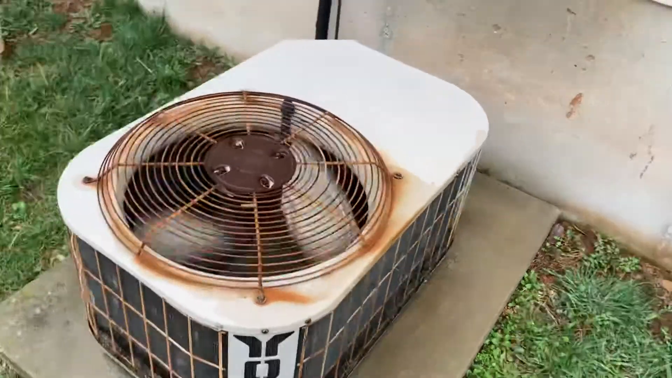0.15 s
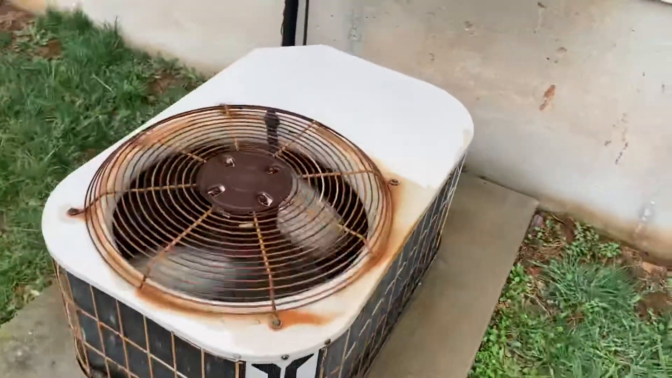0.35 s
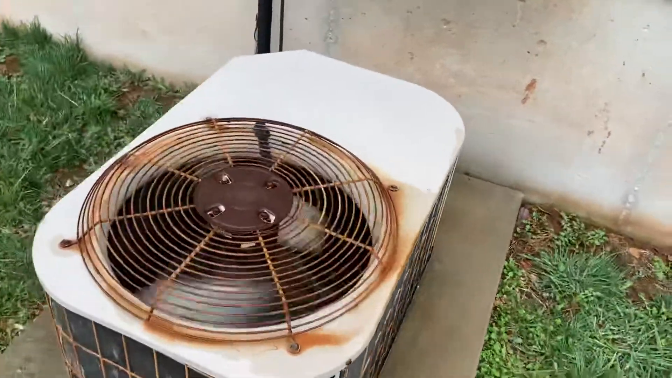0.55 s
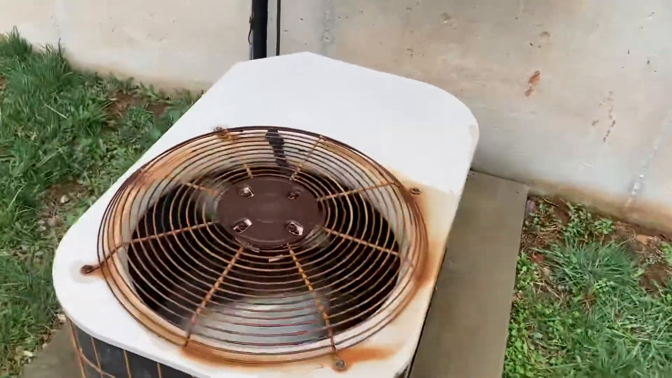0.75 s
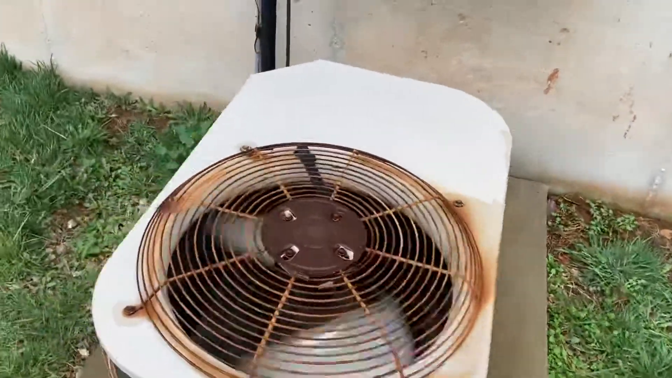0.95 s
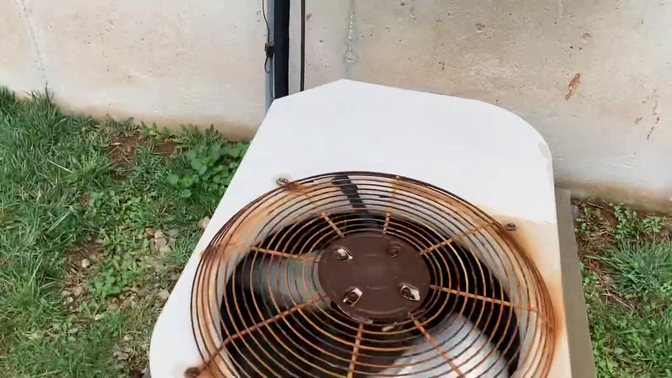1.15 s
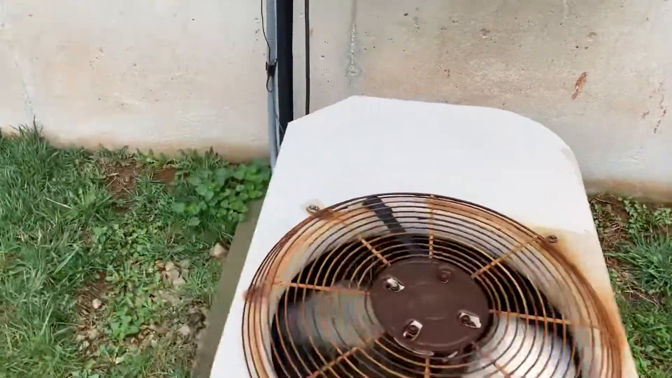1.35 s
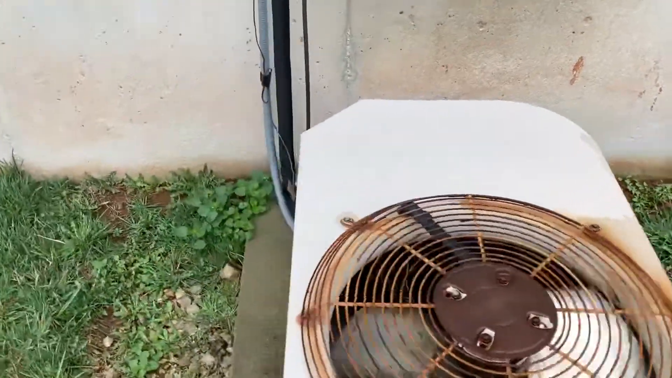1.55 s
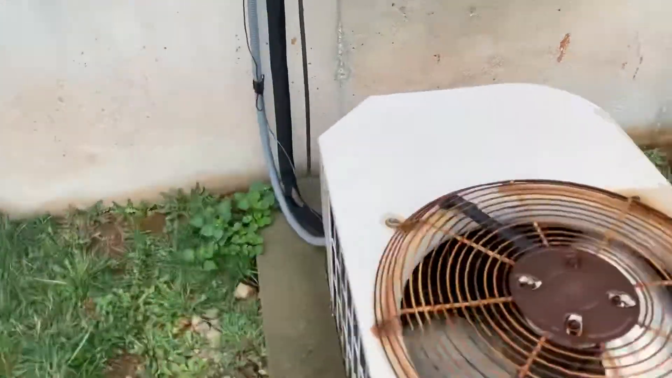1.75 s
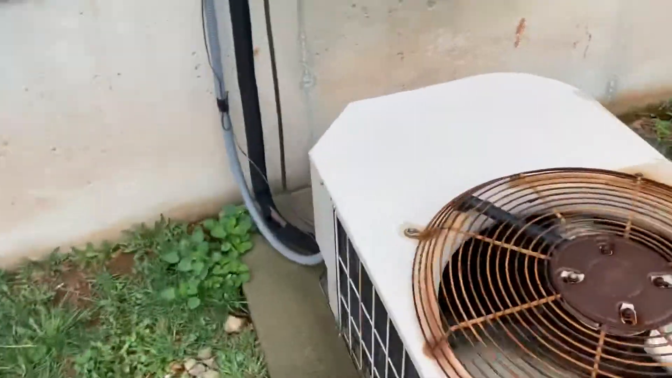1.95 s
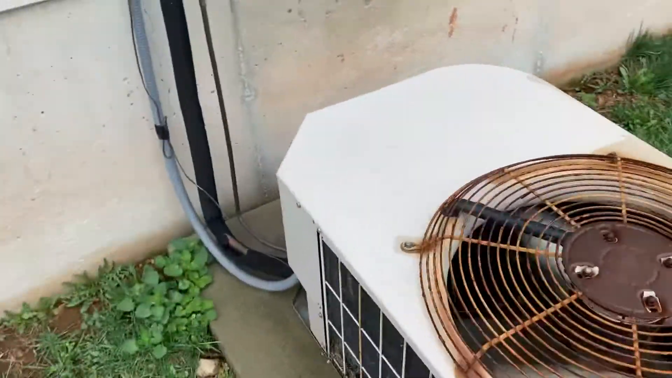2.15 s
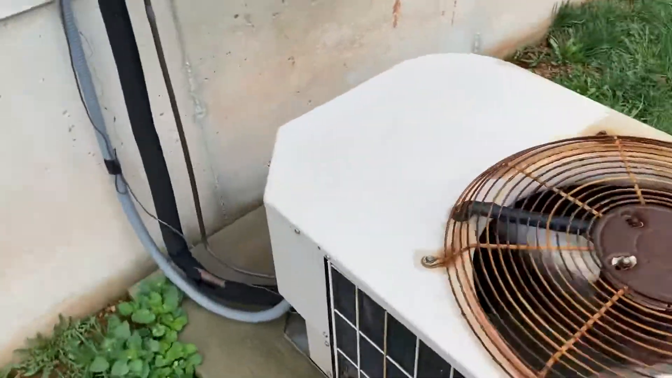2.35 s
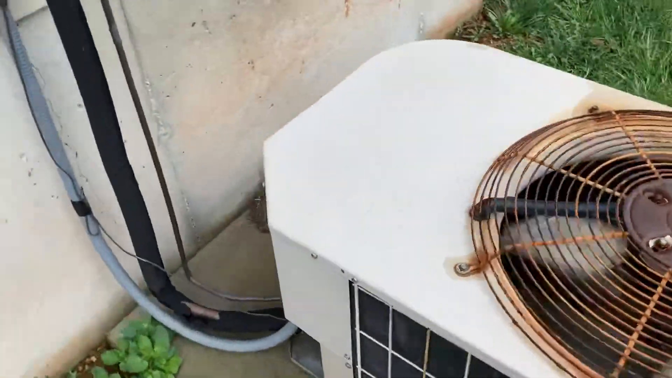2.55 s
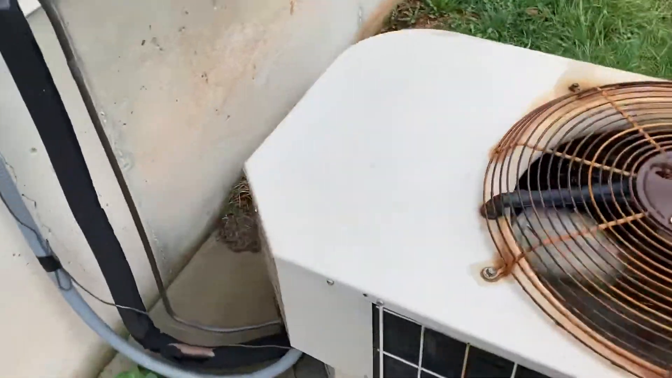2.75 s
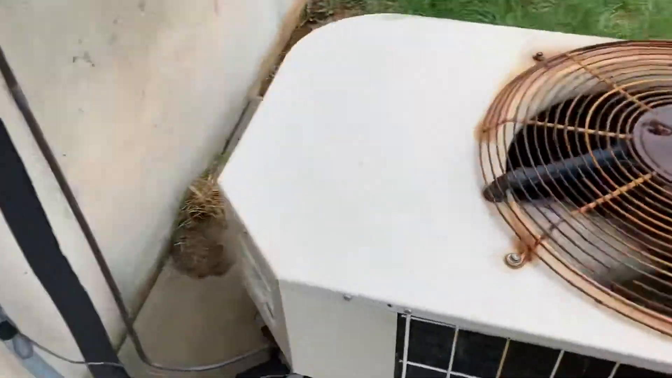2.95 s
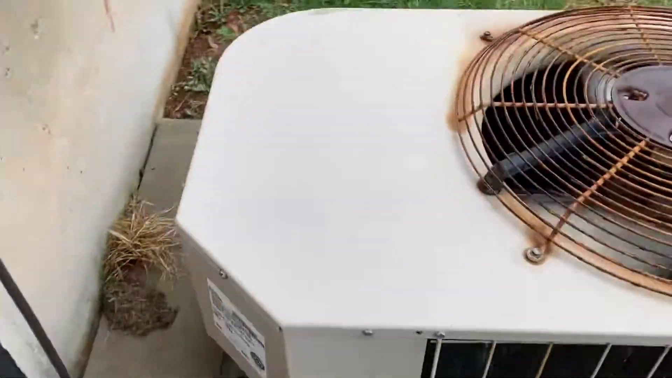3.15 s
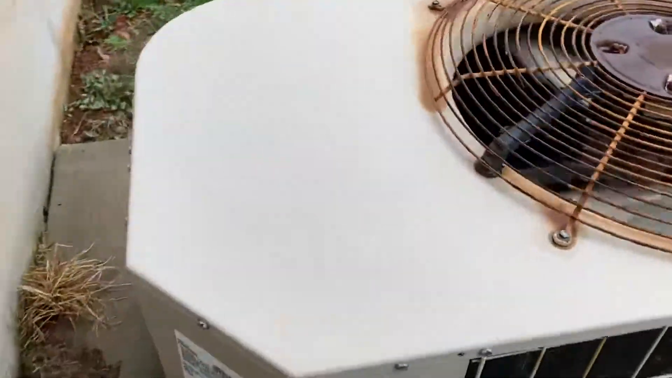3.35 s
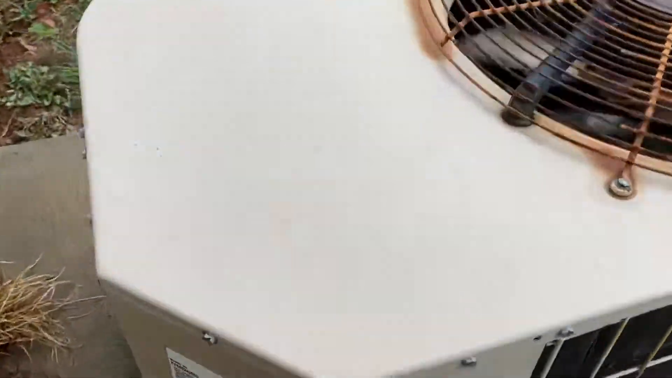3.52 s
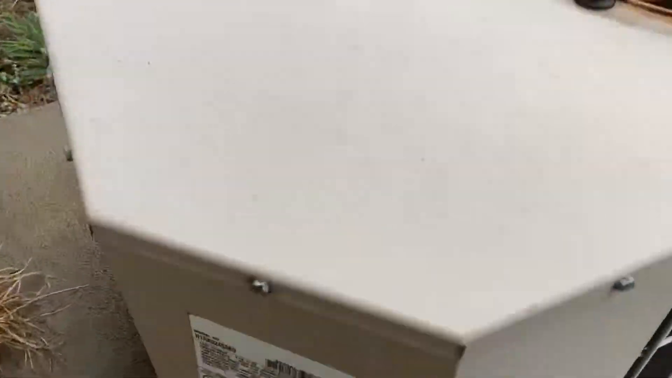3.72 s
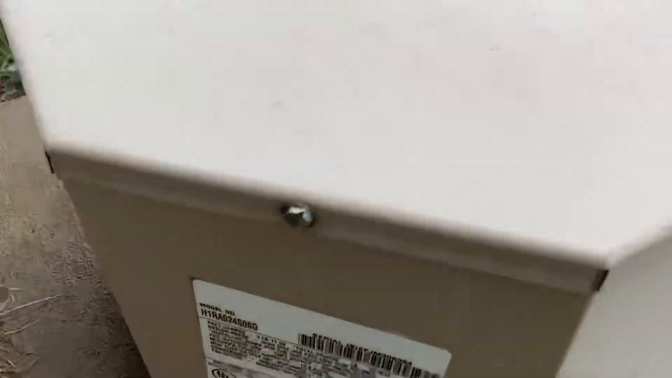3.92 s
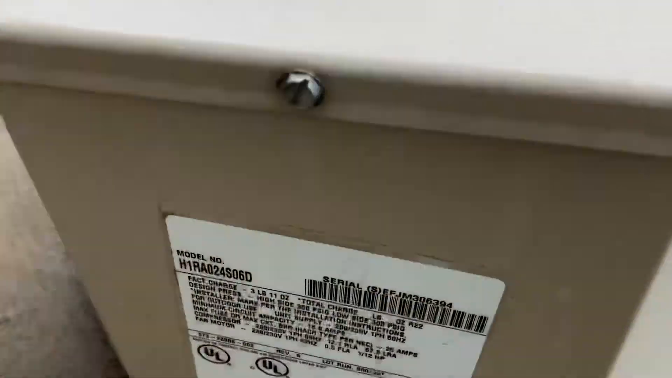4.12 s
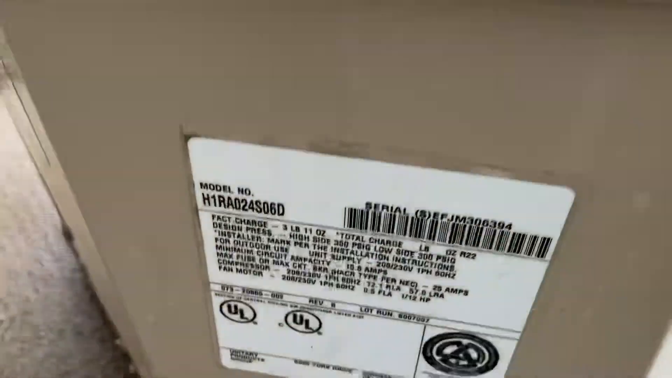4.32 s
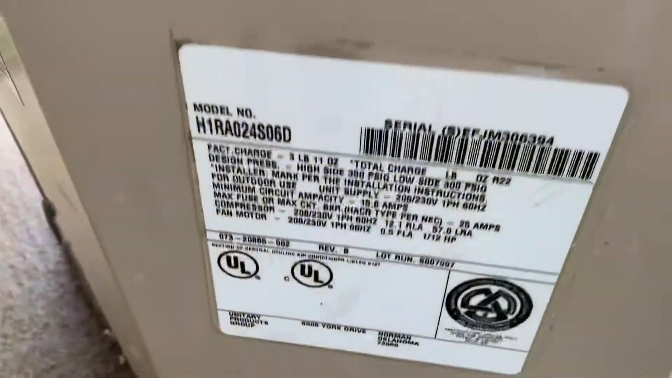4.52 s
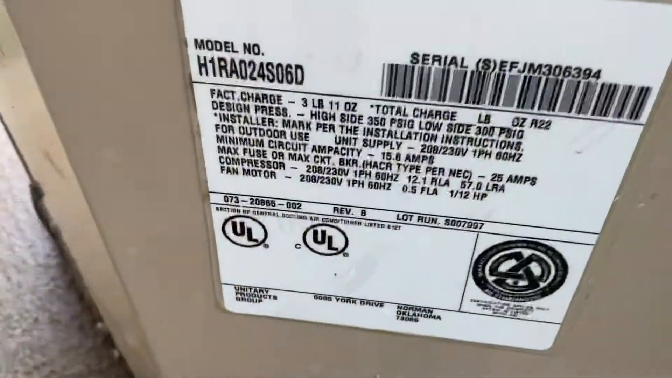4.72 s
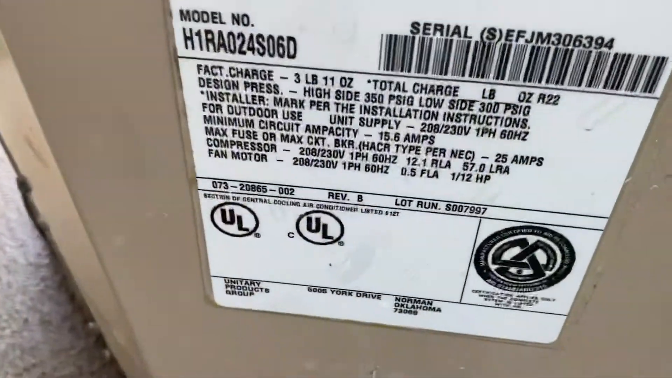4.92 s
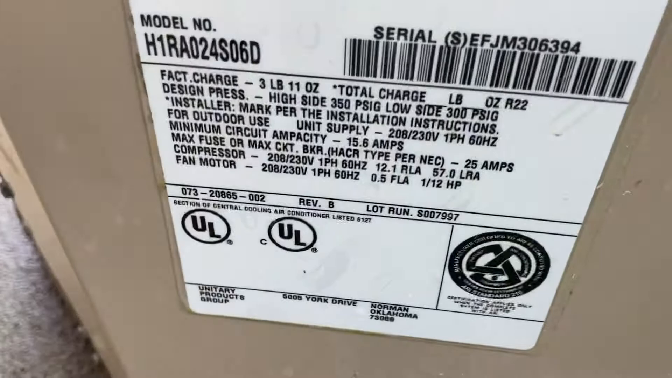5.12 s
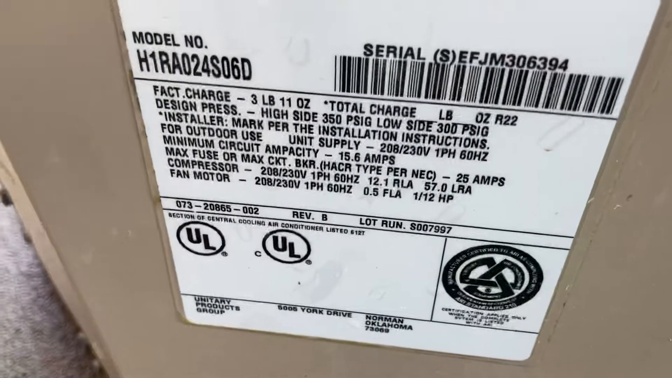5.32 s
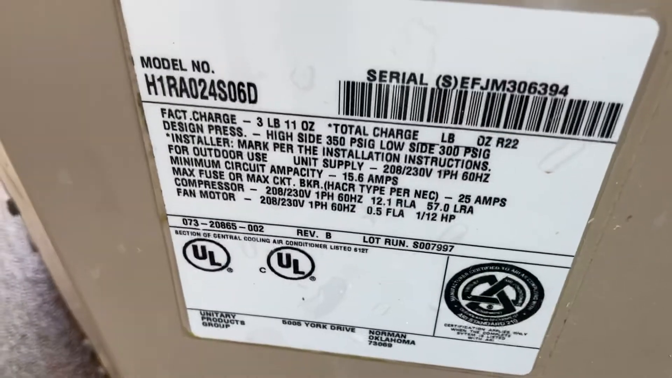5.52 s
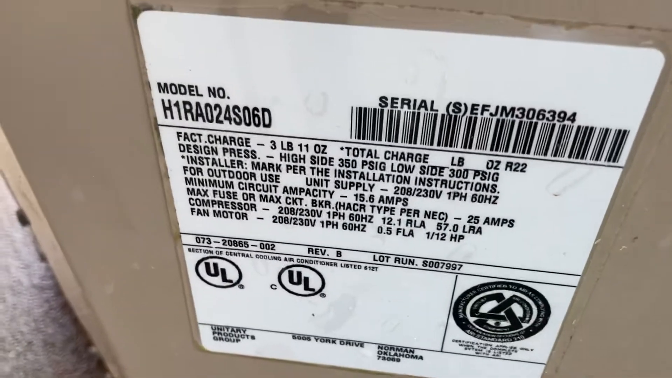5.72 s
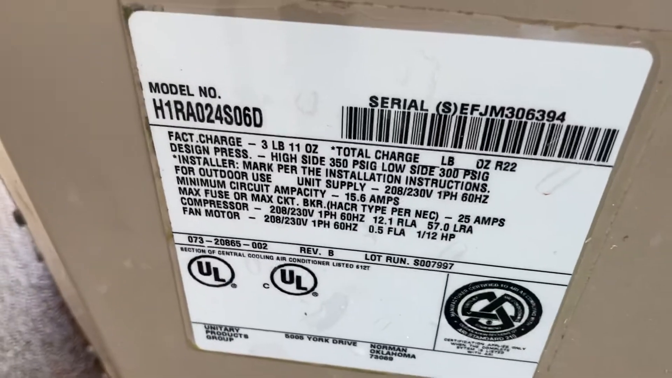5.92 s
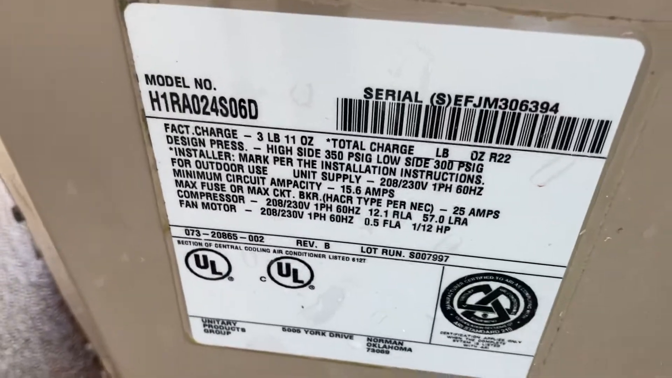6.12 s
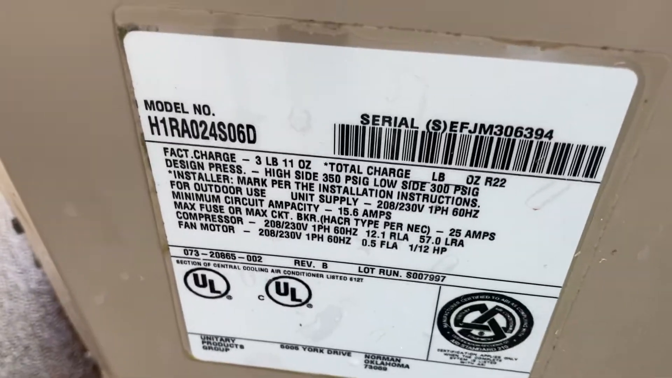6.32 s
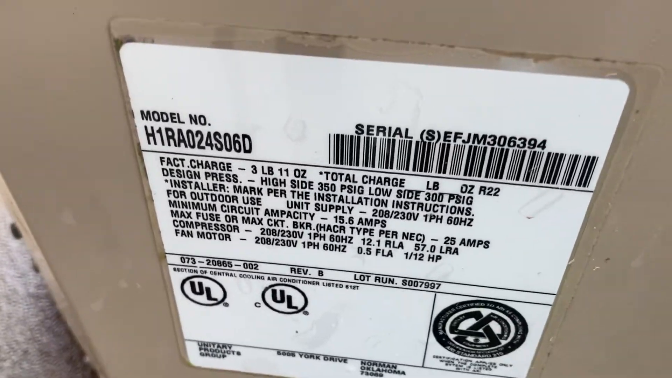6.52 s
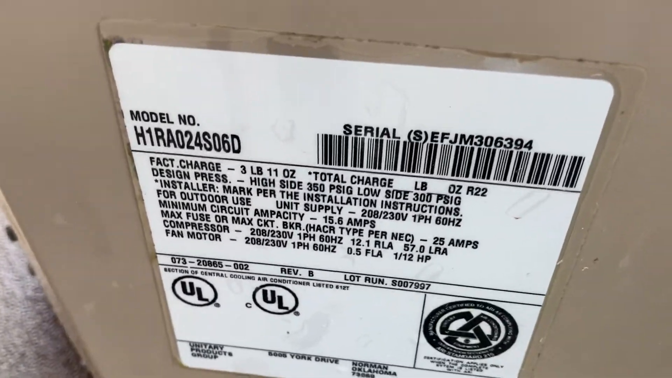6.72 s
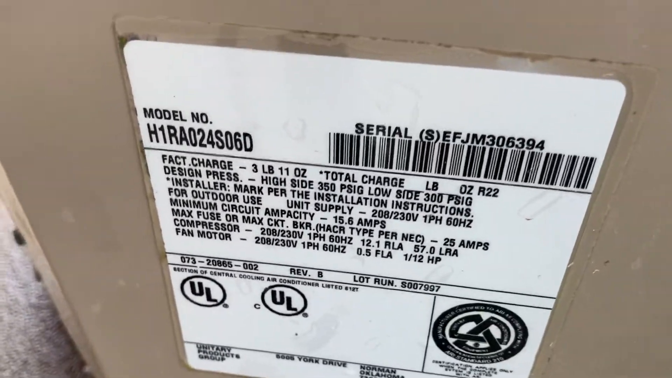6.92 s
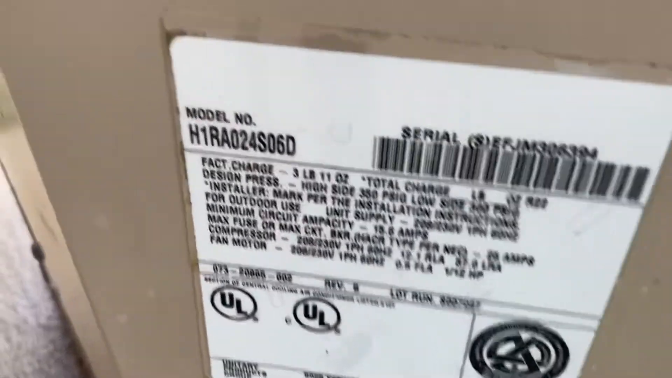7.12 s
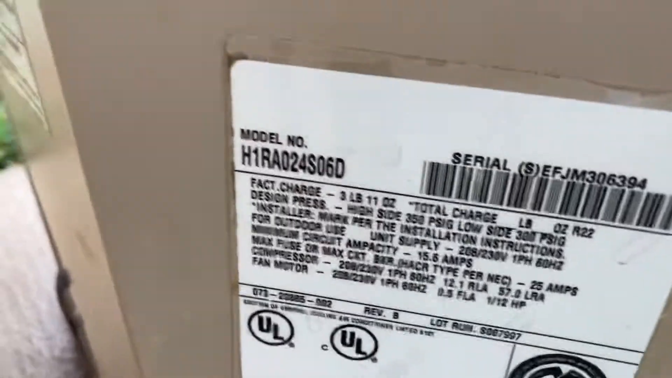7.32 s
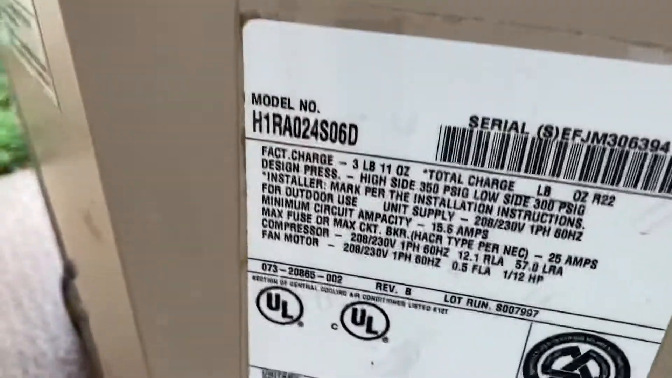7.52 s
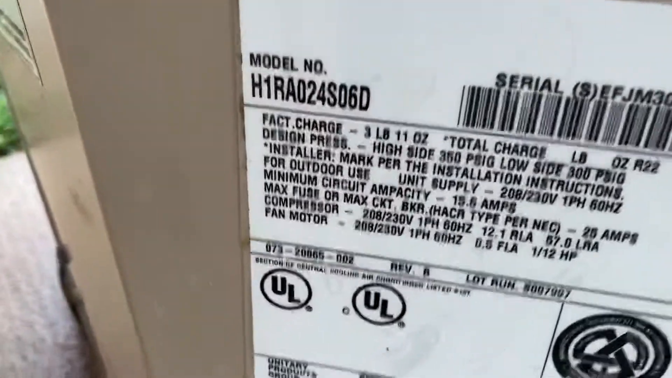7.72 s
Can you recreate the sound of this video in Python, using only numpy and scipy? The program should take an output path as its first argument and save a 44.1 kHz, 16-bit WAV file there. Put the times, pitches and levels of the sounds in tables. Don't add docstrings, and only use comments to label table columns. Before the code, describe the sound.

A continuous mechanical drone with turbulent fan air, picked up in stereo by a handheld phone very close to an outdoor cooling unit. Fine, fast ticking follows each fan turn. Midway, bursts of low wind buffeting slap the microphone, then a short hollow breathy resonance sounds in the gap by the wall, and a run of brighter clicks follows. The end is steady, bassy humming with a wider, uneven stereo image.

```python
import sys
import numpy as np
from scipy import signal
from scipy.fft import rfft, irfft, next_fast_len
from scipy.io import wavfile
from scipy.ndimage import uniform_filter1d

SR = 44100
rng = np.random.default_rng(int(sys.argv[2]) if len(sys.argv) > 2 else 0)


def level_to_linear(level):
    exponent = np.asarray(level, float) / 20
    return 10 ** exponent


def pcm_store(signal):
    levels = np.round(np.clip(np.atleast_2d(signal), -1, 1) * 32767)
    wavfile.write(sys.argv[1], SR, levels.astype(np.int16).T)


N = 347067
T = np.arange(N) / SR
SIZE = next_fast_len(N)
HZ = np.arange(SIZE // 2 + 1) * SR / SIZE
BLOCK = 128
SHAFT_HZ, FAN_HZ, MAINS_HZ = 58.809, 17.287, 60


def unit(x):
    return x / np.sqrt(np.mean(x ** 2))


def curve(table):
    s, *columns = np.transpose(table)
    return [np.interp(T, s, c) for c in columns]


def over_hz(table, hz):
    f, *columns = np.transpose(table)
    return [np.interp(np.log(hz + 1), np.log(f), c) for c in columns]


def wander(rate_hz, t, count=1):
    knots = np.arange(int(t[-1] * rate_hz) + 2)
    targets = rng.standard_normal((count, len(knots)))
    return np.array([np.interp(t * rate_hz, knots, row) for row in targets])


def band(x, lo_hz, hi_hz):
    return signal.sosfilt(signal.butter(2, [lo_hz, hi_hz], "band", fs=SR, output="sos"), x)


def peak_db(s, hold_s, top_db, rise_db_s, fall_db_s):
    t = T[::BLOCK // 4]
    early, late = (s - t).clip(0), (t - s - hold_s).clip(0)
    return np.interp(T, t, top_db - rise_db_s * early - fall_db_s * late)


def two_ports(lean_db):
    return level_to_linear(lean_db * np.array([[.5], [-.5]]))


# t/s, place (0 over the fan, 1 at the corner, 2 beside the panel)
WALK = [
    (0, 0),
    (1.85, 0),
    (2.3, 1),
    (3.2, 1),
    (3.55, 1.4),
    (3.95, 1.75),
    (4.45, 2),
    (7.87, 2),
]


def by_place(levels, step=1):
    place = np.interp(T[::step], *np.transpose(WALK))
    return np.interp(place, np.arange(len(levels)), levels)


# f/Hz, left leads/rad
LEAD_OPEN = [(0, 0), (1810, -0.4), (3010, 2.1), (4310, 0.9), (5250, 1.5), (7490, -0.3), (8440, -3.0),
             (9560, -3.2), (10600, -5.8), (12200, -6.9), (13200, -9.6), (14400, -9.3), (15100, -12.5),
             (16600, -12.7)]
# centre t/s, half length/s, multiple
# of the shaft rate, gain level/dB
LOUD_SPOTS = [(.1, .25, 30, 5), (7.5, .45, 186, 5), (.65, .3, 30, -6), (1.15, .25, 30, 2),
              (1.75, .35, 30, -9), (3.9, .5, 30, -2), (4.15, .2, 30, -2), (3.8, .3, 48, -5),
              (3.3, .9, 41, -3), (4.1, .3, 41, -7), (3.2, .3, 9, 8), (1.2, .65, 74, 6), (.2, .3, 74, -6),
              (2.3, .25, 74, 6), (3.4, .4, 74, 4), (1.2, .5, 48, 4), (.3, .45, 48, -6), (1.3, .45, 58, 5),
              (1.7, .3, 58, -2), (.4, .35, 58, -7), (4.6, .45, 48, 7), (7.1, 1.2, 48, -5),
              (3.45, .25, 6, -5), (2.8, .8, 30, -2), (5.6, 1.2, 122, -4), (4.05, .25, 6, 6),
              (1, 1.2, 119, -7), (6.3, 2, 119, 6), (7.5, .45, 122, 5), (7.6, .3, 114, 5),
              (5.2, 1.2, 114, -7), (7.65, .25, 58, -9), (.2, .3, 10, -12), (.6, .45, 22, 4),
              (3.55, .3, 22, 6), (4.1, .25, 22, -7), (1.55, .25, 23, -5), (2.6, .2, 23, 5),
              (3.55, .45, 23, -10), (3.3, .4, 29, -6), (3.9, .3, 13, 9), (1.9, .3, 16, 10), (.1, .2, 19, 7),
              (3.9, .2, 19, -5), (2.1, .25, 26, 6), (4.3, .6, 26, 3), (.1, .2, 31, 7), (5.9, .2, 30, -3),
              (.7, .8, 2, -2), (2, .2, 4, -7),
              (4.6, .75, 4.081, -6), (6.3, .8, 4.081, 2), (4.7, .8, 4.703, -5), (3.7, .17, 30, -6),
              (1.4, .25, 4, 3), (.05, .2, 1.176, -5), (4.15, .2, 48, 3), (5.05, .15, 48, 4),
              (6.2, 1.1, 2.352, 2), (4.3, .9, 66, -6), (2.25, .1, 6, -6), (3.2, .12, 6, -6),
              (3.7, .2, 31, -6), (3.7, .15, 32, -5)]


def lines(table, base_hz, trim_db, fade_db, swell_db, drift, flutter_db=2.0):
    t = T[::BLOCK]
    multiple, *_, lead_panel = np.transpose(table)[:, :, None]
    hz = multiple * base_hz
    count = len(table)
    shade = np.where(hz < 300, by_place([0, 1, 1], step=BLOCK), by_place([0, 0, 1], step=BLOCK))
    level_db = np.array([by_place(row[1:-1], step=BLOCK) for row in table])
    for s, half_s, spot_multiple, gain_db in LOUD_SPOTS:
        chosen = abs(hz - spot_multiple * SHAFT_HZ) < .5
        level_db += chosen * gain_db * np.exp(-((t - s) / half_s) ** 4)

    moving = np.interp(t, [4.6, 5.2], [1, .6])
    level_db += trim_db * moving
    level_db += swell_db * moving * wander(1.16, t, count)
    level_db += fade_db * moving * wander(3.8, t, count)
    level_db += flutter_db * wander(11, t, count)
    cycles = hz * t + rng.random(hz.shape) + drift * wander(7.1, t, count)
    left = np.sqrt(2) * level_to_linear(level_db) * np.exp(2j * np.pi * cycles)

    lead_open = np.interp(hz, *np.transpose(LEAD_OPEN))
    shortest_turn = np.angle(np.exp(1j * (lead_panel - lead_open)))
    right = left * np.exp(-1j * (lead_open + shortest_turn * shade))
    turn = np.exp(2j * np.pi * hz * T[:BLOCK])
    return np.array([(port.T @ turn).imag.ravel()[:N] for port in (left, right)])


# multiple, level/dB over the fan, at the corner, beside the panel, left leads/rad at panel
THROB = [(1, -51, -44, -42, .4), (2, -39.5, -39, -29, 1.7), (4, -36.5, -44, -42, -3.0),
         (6, -47, -41, -50, 2.7), (8, -74, -74, -54, .3)]


def compressor_throb():
    return lines(THROB, SHAFT_HZ, trim_db=1, fade_db=1.2, swell_db=.5, drift=.025, flutter_db=.8)


# multiple, level/dB over the fan, at the corner, beside the panel, left leads/rad at panel
PUMP = [(9, -52, -66, -53, -1.5), (11, -57, -59, -52, -1.3), (13, -61, -59, -60, 0.0),
        (15, -66, -54, -53, -2.0), (16, -59, -68, -45, 2.7), (17, -62, -56, -56, -0.4),
        (19, -53, -57, -43, 0.8), (21, -58, -67, -55, 3.1), (22, -49, -53, -48, -1.8),
        (23, -50, -50, -48, -2.4), (24, -59, -60, -53, -2.8), (25, -54, -63, -54, -3.1),
        (26, -57, -65, -55, 0.5), (28, -64, -69, -57, -2.2), (29, -61, -58, -50, -2.6),
        (30, -49, -54, -42, 1.1), (31, -59, -62, -46, -2.5), (32, -66, -70, -54, -0.5),
        (34, -72, -66, -61, -1.4), (37, -73, -77, -61, -1.3)]


def compressor_pump():
    return lines(PUMP, SHAFT_HZ, trim_db=.4, fade_db=1.8, swell_db=1.3, drift=.06)


# multiple, level/dB over the fan, at the corner, beside the panel, left leads/rad at panel
VALVES = [(41, -79, -68, -60, -1.8), (42, -70, -73, -61, -2.5), (48, -61, -71, -59, -0.7),
          (50, -64, -70, -62, 2.6), (52, -63, -77, -58, 2.1), (54, -69, -76, -61, 2.8),
          (56, -73, -74, -61, 2.6), (57, -74, -77, -60, 3.0), (58, -65, -72, -56, 2.8),
          (59, -80, -79, -61, -2.5), (60, -68, -76, -61, -2.0), (61, -71, -73, -63, -3.1),
          (62, -68, -69, -58, -3.0), (66, -71, -83, -63, 1.7), (69, -71, -72, -59, -2.5),
          (73, -67, -76, -62, -1.3), (74, -64, -70, -65, -1.6), (79, -75, -88, -63, -0.0),
          (81, -80, -84, -63, 2.9), (103, -80, -78, -67, -0.4), (113, -75, -90, -69, -0.1),
          (114, -75, -77, -67, -1.1), (122, -76, -85, -64, 0.2), (186, -89, -90, -71, 0.3)]


def compressor_valves():
    return lines(VALVES, SHAFT_HZ, trim_db=1.2, fade_db=2.6, swell_db=2.5, drift=.05)


# f/Hz, level/dB over the fan, level/dB beside the panel
BUZZ = [(150, -101, -83), (606, -56, -90), (1560, -96, -91), (2330, -78, -93), (3540, -59.5, -79),
        (4760, -107, -82), (7140, -73, -82), (8060, -108, -84.5), (10900, -79.5, -89.5)]
# f/Hz, left leads/rad
LEAD_PANEL = [(0, -.6), (450, 6.2), (620, 5.2), (1200, 5.3), (1600, 4.7), (1900, 8.4), (3800, 28.2),
              (4570, 32.8), (7240, 38), (8350, 35.2), (9700, 33.8), (12200, 30.6), (13200, 28.2),
              (14400, 28.2), (15200, 24.9), (16600, 25.5)]


def casing_buzz(scatter_db=3.0, corner_db=-4, scatter_rad=0.76):
    multiple = np.setdiff1d(np.arange(3, 200), np.transpose(THROB + PUMP + VALVES)[0])
    hz = multiple * SHAFT_HZ
    open_db, panel_db = over_hz(BUZZ, hz)
    chance = rng.standard_normal((4, len(multiple))).clip(-2, 1.1)
    level_db = np.array([open_db, open_db + corner_db, panel_db]) + scatter_db * chance[1:]
    lead = np.interp(hz, *np.transpose(LEAD_PANEL)) + scatter_rad * chance[0]
    table = np.transpose([multiple, *level_db, lead])
    return lines(table, SHAFT_HZ, trim_db=0.0, fade_db=5.0, swell_db=5.5, drift=0.12)


# multiple, level/dB over the fan, at the corner, beside the panel, left leads/rad at panel
BLADES = [(2, -58, -51, -35, -.3), (3, -62, -59, -55, -.3), (4, -36.5, -54, -25.5, .4),
          (5, -71, -59, -47, 1.8), (6, -52, -51, -43, 1.2), (8, -46, -46, -44, 1.5),
          (10, -55, -50, -47, 2.4), (12, -50, -65, -49, 2.9), (16, -48, -59, -46, -1.7),
          (18, -55, -73, -55, -1.3), (20, -57, -53, -55, -.2)]


def fan_blades():
    return lines(BLADES, FAN_HZ, trim_db=.8, fade_db=1.2, swell_db=.8, drift=.014, flutter_db=1.1)


# multiple, level/dB over the fan, at the corner, beside the panel, left leads/rad at panel
HUM = [(2, -45, -56, -42, 1.2), (4, -46, -46, -38, -2.4)]


def mains_hum():
    return lines(HUM, MAINS_HZ, trim_db=-2.5, fade_db=1.2, swell_db=1.5, drift=.02)


# f/Hz, level/dB per Hz
AIR_OPEN = [(20, -5), (70, 8.5), (180, 1.5), (300, 0), (490, -15.5), (1330, -20.5), (2160, -36.5),
            (4300, -39.5), (5800, -49.5), (7100, -46.5), (9000, -45), (11000, -45.5), (13600, -50),
            (16000, -54.5)]
# f/Hz, level/dB per Hz
AIR_PANEL = [(20, -18), (74, -7.5), (134, -5.5), (200, -10), (380, -13), (1020, -12.5), (1790, -22),
             (2610, -30), (5800, -41.5), (7300, -45), (9000, -42), (11000, -43.5), (13600, -50.5),
             (16000, -51)]
# level/dB over the fan, at the corner, beside the panel, share of the jet's swell
AIR = [
    (-38.5, -38.5, -32, 0.34),
    (-36, -38.5, -40.5, 0.27),
    (-45.5, -45, -44.5, 1.22),
    (-55, -52, -53, 0.7),
]
AIR_EDGES_HZ = [400, 2000, 6000]
# f/Hz, open 0-1, panel 0-1
UNLIKE = [(40, 0.4, 0), (304, 0.14, 0.62), (695, 0.23, 0.79), (1390, 0.57, 0.87), (3450, 1, 0.87),
          (6500, 1, 1), (8400, 0.4, 0.2), (9500, 0.32, 0.15), (11500, .04, .03), (15000, 0.3, 0.7)]
# t/s, swell level/dB
JET = [(0, -4), (0.06, 0.5), (.4, -1), (1.5, 3), (2.0, 1), (2.7, -1), (3.15, 1), (3.45, 0.5), (3.75, 0.5),
       (4.2, 0.5), (4.8, 0), (6.4, -0.5), (7.6, 0), (7.87, 0)]


def air(shade, flicker_db=.9, sway_db=.9):
    edges = [1 / (1 + (HZ / hz) ** 6) for hz in AIR_EDGES_HZ]
    masks = np.diff([0 * HZ, *edges, 0 * HZ + 1], axis=0)
    beat_db = .6 * np.sin(2 * np.pi * SHAFT_HZ * T)
    beat_db += .4 * np.sin(2 * np.pi * FAN_HZ * np.outer([1, 2], T)).sum(axis=0)
    jet_db = curve(JET)[0]
    out = np.zeros((2, N))
    views = zip((AIR_OPEN, AIR_PANEL), (LEAD_OPEN, LEAD_PANEL), over_hz(UNLIKE, HZ), (1 - shade, shade))
    for colour, lead, unlike, share in views:
        left, other = rfft(rng.standard_normal((2, SIZE))) * level_to_linear(over_hz(colour, HZ)[0])
        unlike = unlike.clip(0, 1)
        slipped = left * np.exp(-1j * np.interp(HZ, *np.transpose(lead)))
        ports = np.array([left, np.sqrt(1 - unlike) * slipped + np.sqrt(unlike) * other])
        for mask, (*place_db, follows) in zip(masks, AIR):
            level_db = beat_db + by_place(place_db) + follows * jet_db
            level_db = level_db + flicker_db * wander(13, T) + sway_db * wander(5.5, T)
            part = unit(irfft(ports * np.sqrt(mask), SIZE)[:, :N])
            out += np.sqrt(share) * level_to_linear(level_db) * part
    return out


# t/s, extra path/ms
ECHO = [(0, 1.04), (.9, 0.69), (1.4, 1.6), (2.5, 0.52), (3.3, 0.59), (3.8, 0.59), (4.3, 0.67), (4.8, 0.56),
        (7.87, 0.58)]


def reflect(x, share=0.11):
    at = np.arange(N) - curve(ECHO)[0] * SR / 1000
    late = np.array([np.interp(at, np.arange(N), port) for port in x])
    return (x + share * late) / np.sqrt(1 + share ** 2)


# centre t/s, half length/s, f/Hz, half width/Hz, gain
# level/dB
PATCHES = [(0.71, 0.87, 6300, 260, 0), (1.4, 0.49, 4400, 120, 3), (0.97, .8, 6700, 150, 2.5),
           (1.7, 0.22, 7200, 200, 1), (1.5, .4, 8500, 200, 1.5), (0.73, 0.59, 2920, 140, 5.5),
           (1, 0.39, 4600, 300, -4), (2.27, 0.39, 5540, 470, -7), (2.8, .35, 4600, 180, -4),
           (2.7, 0.23, 3860, 220, -6), (2.44, 0.56, 2830, 340, -6), (2.64, 0.27, 7400, 360, -4),
           (3.17, 0.21, 1960, 260, -8.5), (3.3, 0.33, 4470, 240, 5), (3.34, 0.24, 6900, 140, 6),
           (3.6, .25, 7600, 200, -4), (4, .3, 8400, 250, 6), (4.37, 0.43, 7220, 190, 9.5),
           (4, .4, 7000, 150, 5), (4.1, 0.79, 5000, 200, 2), (4.7, 0.54, 3200, 97, -8),
           (6.8, 2.1, 3610, 200, 4.5), (4.5, 2.9, 2740, 150, 2), (8, 1.4, 3900, 69, -6),
           (5.5, 2.3, 5860, 260, -5.5), (6.5, 1.6, 6050, 110, 7), (5.6, 1.7, 7200, 150, 4),
           (5.6, 2, 4300, 330, 1), (7.75, .45, 5050, 210, 7.5), (7.6, .5, 4160, 180, 7.5),
           (4.73, 0.74, 146, 36, -6), (2.76, 0.32, 260, 71, 7), (.7, 0.22, 910, 270, 2.5),
           (6.6, 1.2, 300, 59, 4.5), (3.45, 0.18, 520, 99, 4), (4.4, 1.9, 3000, 63, -2),
           (7.6, .5, 3200, 90, -4), (1.55, 0.35, 290, 110, 3),
           (3.57, 0.14, 2000, 250, -1), (3.5, 0.13, 2500, 160, 8), (4.1, .1, 3500, 500, -5),
                  (2.9, .3, 2420, 76, 2), (3.1, .12, 3170, 90, -6), (4.3, .5, 3500, 67, -2),
                  (3.2, 0.14, 940, 170, -5), (2.46, .15, 800, 160, -3.5), (2.1, 1.9, 15800, 450, 2),
                  (6.2, 1.8, 15600, 300, -3.5), (2.92, 0.11, 540, 90, 5.5)]


def patchy(x, moving_db=1.5, still_db=1.2, quick_db=1.9, patch_hz=200, patch_s=.35):
    hz, t, z = signal.stft(x, SR, nperseg=512)
    knots = np.arange(0, SR / 2 + patch_hz, patch_hz)
    count = len(knots)
    resting = np.interp(t, [4.3, 4.9], [0, 1])
    field = (1 - 0.14 * resting) * moving_db * wander(1 / patch_s, t, count)
    field = field + resting * still_db * rng.standard_normal((count, 1))
    field = field + quick_db * np.repeat(wander(11, t, count // 4 + 1), 4, axis=0)[:count]
    colour_db = np.array([np.interp(hz, knots, column) for column in field.T]).T
    colour_db = colour_db * np.interp(hz, [600, 2500, 8000, 10000], [0.22, 1.0, 0.95, 0.79])[:, None]
    for s, half_s, centre_hz, half_hz, gain_db in PATCHES:
        across = np.exp(-((hz - centre_hz) / half_hz) ** 2)
        along = np.exp(-((t - s) / half_s) ** 4)
        colour_db += gain_db * np.outer(across, along)
    return signal.istft(z * level_to_linear(colour_db), SR, nperseg=512)[1][:, :N]


TICK = [-53, -47.5, -48]


def ticks(first_s=0.0497, rise_s=0.0022, fall_s=0.0026, snap_skew_rad=.35):
    turns = np.arange(first_s, N / SR - .01, 1 / FAN_HZ)
    chance = rng.standard_normal((len(turns), 2))
    hits = np.zeros(N)
    at = ((turns + 0.0013 * chance[:, 0]) * SR).astype(int)
    hits[at] = level_to_linear(by_place(TICK)[at] + 2.2 * chance[:, 1].clip(-2, 1))
    for s, *_ in SNAPS:
        hits[int((s - .02) * SR):int((s + .02) * SR)] = 0
    t = np.arange(1500) / SR
    shape = (1 - np.exp(-t / rise_s)) * np.exp(-t / fall_s)
    scrape = signal.fftconvolve(hits, shape / shape.max())[:N]
    scrape = scrape * unit(band(rng.standard_normal(N), 12100, 14400))
    snap = snaps()
    right = rfft(scrape, SIZE) + rfft(snap, SIZE) * 1.3 * np.exp(1j * snap_skew_rad)
    right = right * np.exp(-1j * np.interp(HZ, *np.transpose(LEAD_OPEN)))
    return np.array([scrape + snap, .7 * irfft(right, SIZE)[:N]])


# t/s, hold/s, thud level/dB, flap minus thud level/dB
GUSTS = [(1.431, 0.0092, -23, -5), (1.523, 0.022, -22, -23), (1.67, 0.066, -20, -5),
         (1.774, 0.067, -23, -4), (1.868, 0.1, -23.5, -12), (1.988, 0.028, -25, -24),
         (2.045, 0.065, -21.5, -21), (2.13, 0.15, -24, -32), (2.397, 0.058, -28, -14),
         (2.487, 0.022, -24.5, -10), (2.607, 0.013, -25, -10), (2.765, 0.025, -28, -12),
         (2.94, 0.034, -36, -2), (3.128, 0.1, -29.5, -27), (3.256, 0.095, -23, -19),
         (3.38, 0.072, -24.5, -26), (3.47, 0.013, -24.5, -12), (3.538, 0.017, -21, -17),
         (3.608, 0.014, -22, -0.5), (3.642, 0.015, -22, -8), (3.704, 0.083, -31, -16)]


def gusts(crack_db=-7, rise_db_s=850, fall_db_s=650, pan_db=3.5):
    thud, flap = np.zeros((2, 2, N))
    for (s, hold_s, thud_db, flap_db), lean in zip(GUSTS, rng.standard_normal(len(GUSTS))):
        near = slice(int((s - .15) * SR), int((s + hold_s + .15) * SR))
        puff = level_to_linear(peak_db(s, hold_s, thud_db, rise_db_s, fall_db_s)[near]) * two_ports(pan_db * lean)
        thud[:, near] = np.maximum(thud[:, near], puff)
        flap[:, near] = np.maximum(flap[:, near], puff * level_to_linear(flap_db))
    crack = level_to_linear(crack_db) * flap ** 2 / flap.max()
    out, unlike = 0, by_place([.2, .8, .25]).clip(0, 1)
    for lo_hz, hi_hz, size in ((46, 99, thud), (110, 208, flap), (241, 420, crack)):
        noise = band(rng.standard_normal((3, N)), lo_hz, hi_hz)
        eddies = np.sqrt(1 - unlike) * noise[0] + np.sqrt(unlike) * noise[1:]
        out = out + size * eddies / np.sqrt(uniform_filter1d(np.mean(eddies ** 2, axis=0), 900))
    return out


# t/s, peak level/dB, f/Hz, push 1 or pull -1
SLAPS = [(1.438, -23, 90, -1), (1.664, -12, 106, -1), (1.711, -20, 125, -1), (1.7965, -9, 150, 1),
         (1.816, -14, 170, 1), (1.835, -11.5, 85, 1), (3.429, -18, 54, -1), (3.56, -18, 52, 1),
         (3.654, -13, 89, 1), (3.54, -16, 130, 1), (3.64, -21, 380, -1), (1.776, -10, 100, -1),
         (1.8024, -8.5, 230, -1), (1.8275, -13, 210, -1), (2.053, -16, 95, -1), (2.49, -18, 100, -1),
         (3.46, -15.5, 115, 1), (3.53, -14.5, 138, -1), (3.634, -9, 140, 1), (3.621, -22, 420, 1),
         (1.767, -20, 440, 1), (3.666, -14, 69.5, -1)]


def slaps(length_cycles=0.65, pan_db=1.5):
    out = np.zeros((2, N))
    for (s, top_db, hz, sign), lean in zip(SLAPS, rng.standard_normal(len(SLAPS))):
        near = slice(int((s - .05) * SR), int((s + .05) * SR))
        turns = (T[near] - s) * hz
        swing = np.exp(-(turns / length_cycles) ** 2) * np.cos(2 * np.pi * turns)
        out[:, near] += np.sign(sign) * level_to_linear(top_db) * two_ports(pan_db * lean) * swing
    return out


# t/s, click level/dB, click centre f/Hz, ring level/dB
SNAPS = [(2.829, -39, 11500, -56), (2.8883, -39, 11500, -54), (2.9487, -37, 12000, -52),
         (3.805, -36, 14200, -44), (3.867, -27.5, 14000, -42), (3.922, -37, 13800, -42),
         (3.982, -34, 14400, -43), (4.038, -38, 13500, -38), (4.093, -47, 14000, -42),
         (4.152, -35, 13800, -44), (4.21, -38, 14100, -39), (4.268, -40, 14200, -45),
         (4.329, -45, 13800, -43), (4.385, -52, 13400, -40), (7.2185, -38, 12800, -42)]


def snaps(rise_s=0.00056, fall_s=0.003, width=0.12, ring_hz=13800, ring_late_s=0.006, ring_fall_s=0.0052):
    out, t = np.zeros(N), T[:1500]

    def shape(t, fall):
        return (1 - np.exp(-t / rise_s)) * np.exp(-t / fall)

    for (s, click_db, hz, ring_db), noise in zip(SNAPS, rng.standard_normal((len(SNAPS), 2, len(t)))):
        click = unit(band(noise[0], hz * (1 - width), min(hz * (1 + width), 17000))) * shape(t, fall_s)
        ring = unit(band(noise[1], ring_hz - 350, ring_hz + 350))
        ring = ring * shape((t - ring_late_s).clip(0), ring_fall_s)
        at = int((s - .001) * SR)
        out[at:at + len(t)] += level_to_linear(click_db) * click + level_to_linear(ring_db) * ring
    return out


def slot():
    ring = band(band(rng.standard_normal(N), 620, 737), 657, 780)
    return unit(ring) * level_to_linear(peak_db(3.57, hold_s=0.11, top_db=-39, rise_db_s=45, fall_db_s=25))


def scene():
    compressor = compressor_throb() + compressor_pump() + compressor_valves() + casing_buzz()
    rushing = patchy(reflect(air(shade=by_place([0, 1, 1]))))
    draught = gusts() + slaps()
    return compressor + fan_blades() + mains_hum() + rushing + ticks() + draught + slot()


def top_cut(x):
    return signal.sosfilt(signal.butter(12, 17040, fs=SR, output="sos"), x)


def record(dry):
    x = signal.sosfilt(signal.butter(3, 24, "high", fs=SR, output="sos"), dry)
    x = signal.sosfilt(signal.ellip(8, .2, 60, 15780, fs=SR, output="sos"), x)
    bass = signal.sosfilt(signal.butter(1, 95, fs=SR, output="sos"), x)
    mix = x + bass * np.array([[-.16], [.16]])
    return top_cut(mix)


dry = scene()
out = record(dry)
pcm_store(out)
```